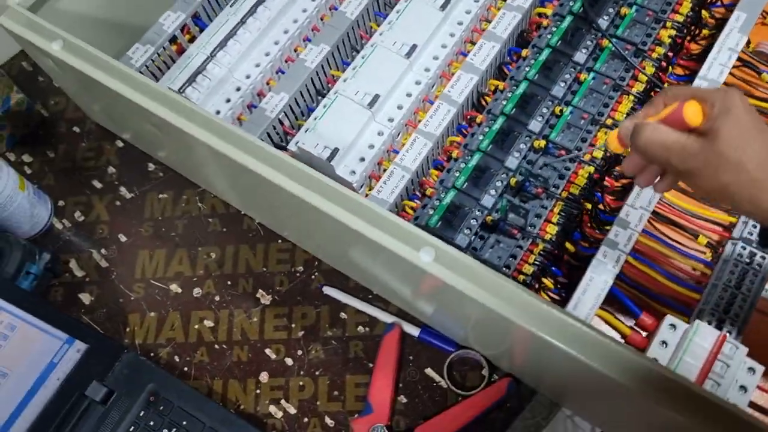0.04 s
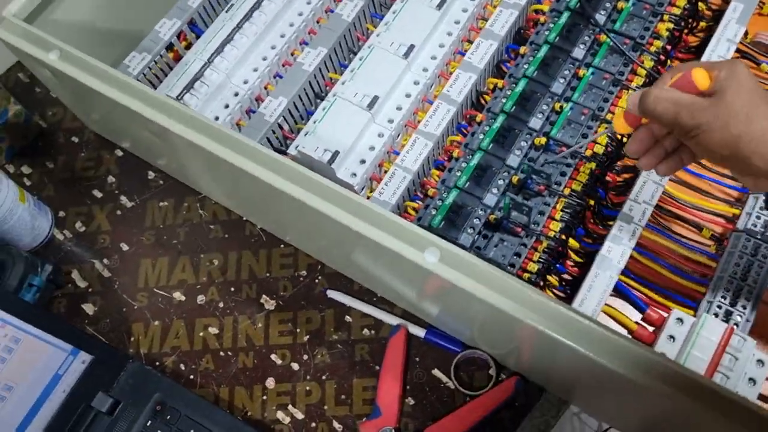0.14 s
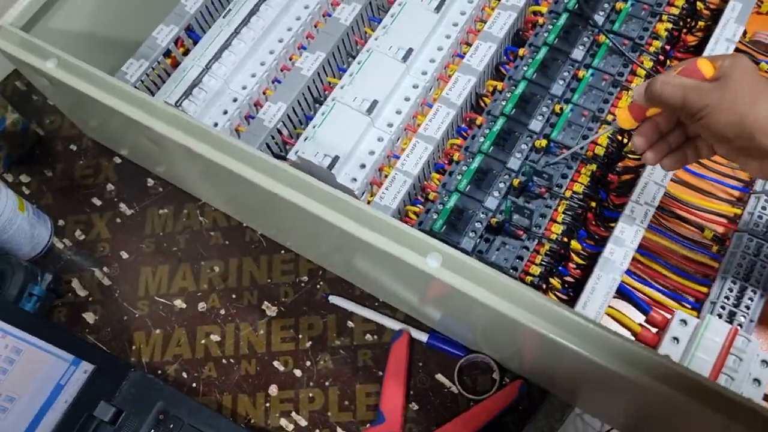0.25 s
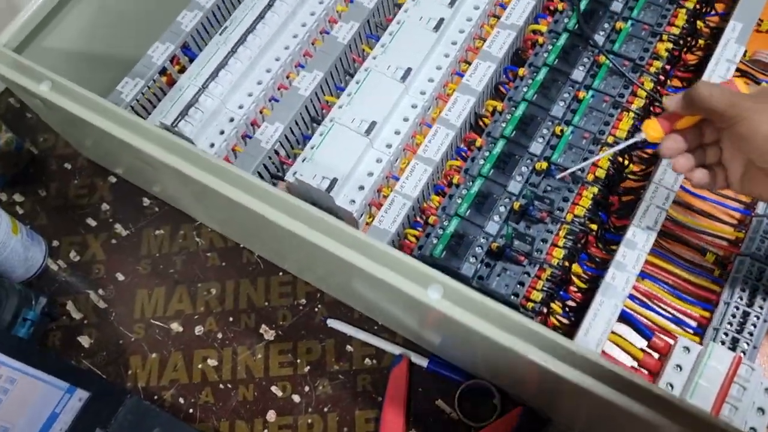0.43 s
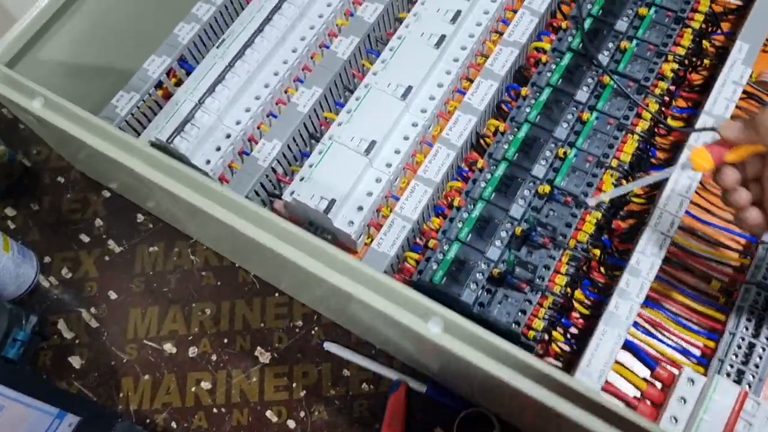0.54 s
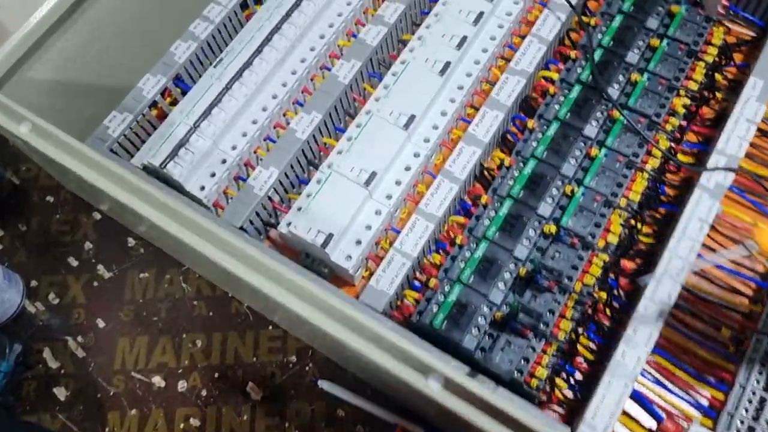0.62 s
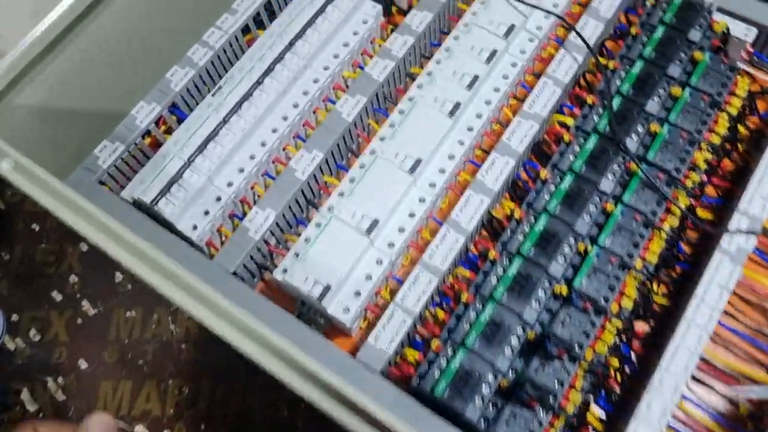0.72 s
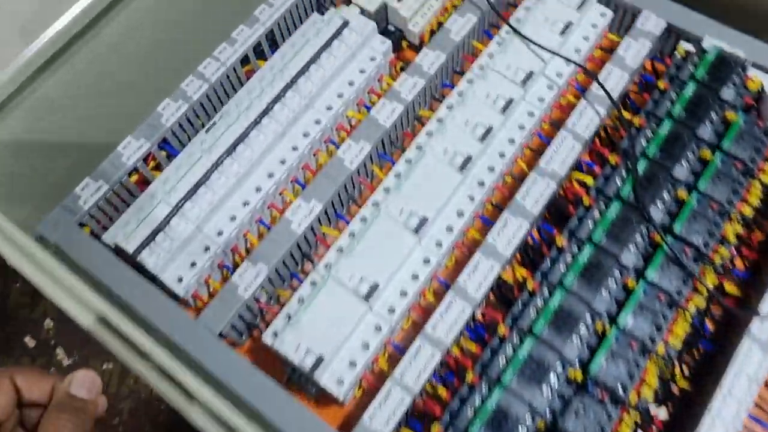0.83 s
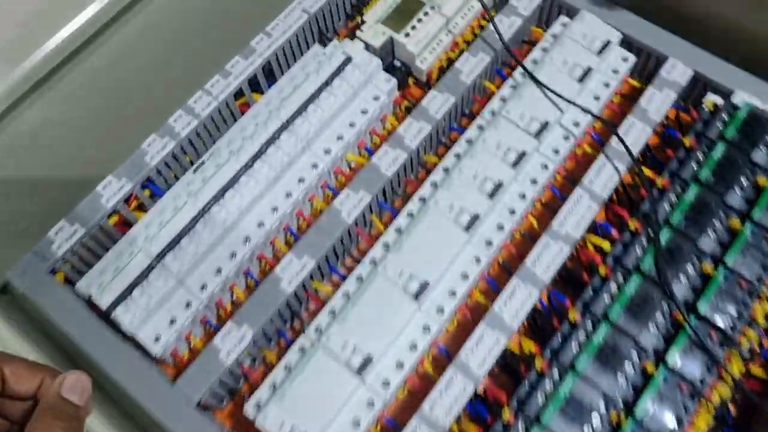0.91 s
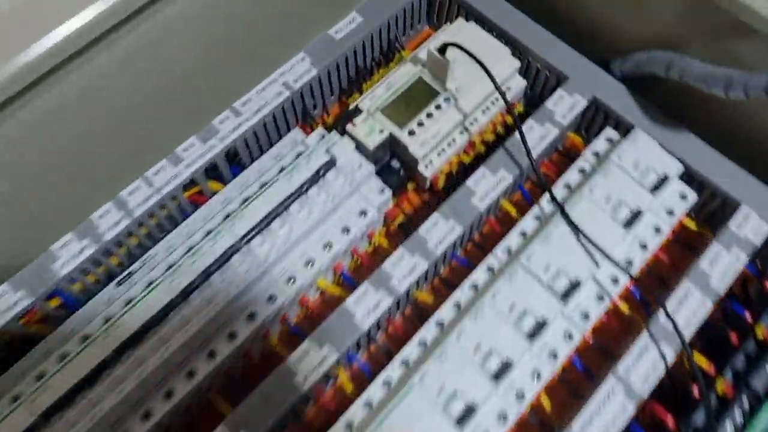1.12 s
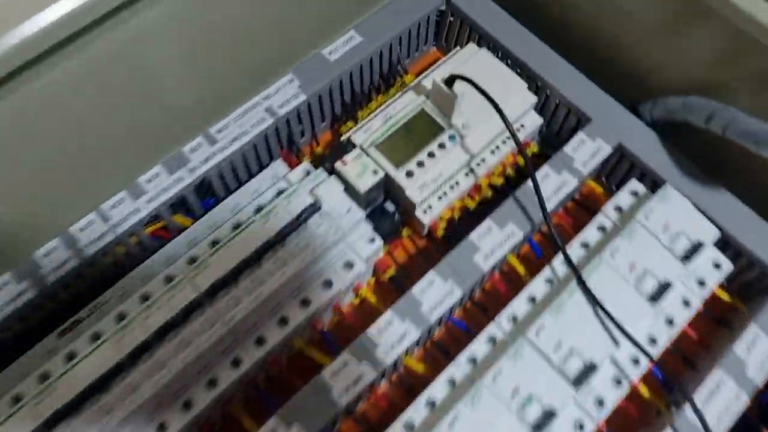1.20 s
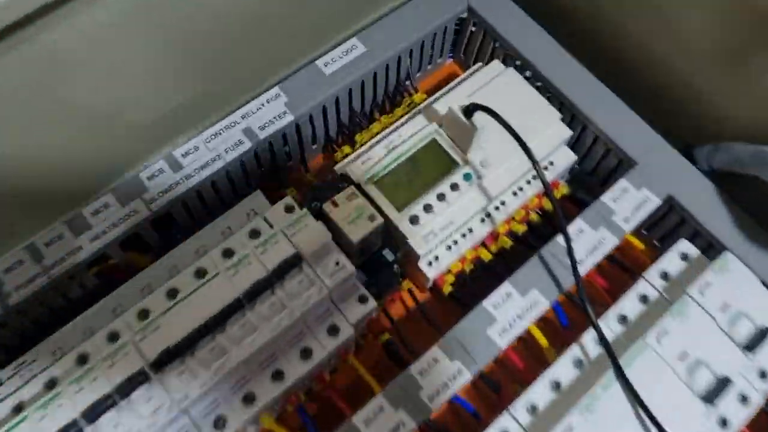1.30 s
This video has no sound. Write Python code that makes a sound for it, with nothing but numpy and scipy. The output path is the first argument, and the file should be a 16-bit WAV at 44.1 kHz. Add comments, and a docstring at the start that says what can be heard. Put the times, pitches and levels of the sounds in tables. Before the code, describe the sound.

Loud hard relay clack, tripped by hand in a steel cabinet, then low boom and faint rustling.

```python
"""Room hiss with a faint mains hum is heard first; then an overload relay in a sheet-steel panel, tripped by hand
close to two microphones: a latch snaps, rebounds, then the contactor slams. Each blow is a chatter of random
impacts that excites housing modes and a decaying room tail; the panel booms low as a sum of damped sines.
Small ticks (resonant noise puffs), a rustle of movement (noise with a drifting resonance), low rumble and
low bumps (damped sines) follow."""
import sys
import numpy as np
from scipy import signal
from scipy.fft import rfft, irfft, next_fast_len
from scipy.io import wavfile
from scipy.ndimage import map_coordinates

SR = 44100
rng = np.random.default_rng(int(sys.argv[2]) if len(sys.argv) > 2 else 0)


def generate_wav(sig):
    """Save sig (samples, or channels by samples) to the path in sys.argv[1] as 16-bit PCM at SR."""
    pcm = np.round(np.clip(np.atleast_2d(sig).T, -1, 1) * 32767).astype(np.int16)
    wavfile.write(sys.argv[1], SR, pcm)


def attenuation_scalar(level_db):
    """Turn a level in dB into a linear amplitude multiplier (20 dB per decade)."""
    decades = np.asarray(level_db, float) / 20
    return 10 ** decades


N = 59535
T = np.arange(N) / SR


def unit(x):
    """Normalisation: scales a signal to rms 1."""
    return x / np.sqrt(np.mean(x ** 2) + 1e-20)


def along(points, hz):
    """Logarithmic frequency scale: interpolates (frequency [Hz], value) points on it."""
    f, v = np.transpose(points)
    return np.interp(np.log(hz + 1), np.log(f + 1), v)


def filtered(x, response):
    """Linear filtering: multiplies the spectrum by a complex response of frequency."""
    m = next_fast_len(N + SR // 2)
    hz = np.fft.rfftfreq(m, 1 / SR)
    return irfft(rfft(x, m) * response(hz), m)[..., :N]


def wobble(rate):
    """Slow random modulation: a smooth curve through rate random knots a second."""
    knots = rng.standard_normal(int(N * rate / SR) + 4)
    return map_coordinates(knots, [T * rate])


def rush(spectrum, alike):
    """Partial coherence: mid and side noises share the power to set left-right likeness; rms 1."""
    def mid_side(hz):
        angle = np.arccos(np.clip(along(alike, hz), -1, 1)) / 2
        return attenuation_scalar(along(spectrum, hz)) * [np.cos(angle), np.sin(angle)]

    mid, side = filtered(rng.standard_normal((2, N)), mid_side)
    return unit(np.array([mid + side, mid - side]))


def lagged(sound, lag_s):
    """Time difference of arrival: a linear phase delays the left microphone by lag_s."""
    return filtered(sound, lambda hz: np.exp(-2j * np.pi * hz * np.array([[lag_s], [0]])))


# Relative noise spectrum of the room: (frequency [Hz], spectral level [dB per Hz])
AIR = [(20, -23.5), (45, -5.5), (85, -2), (130, -23), (250, -23.5), (500, -25.5), (900, -30.5),
       (2000, -34.5), (4000, -34.5), (7000, -33.5), (8500, -43), (10500, -45), (13000, -44), (16000, -40.5)]
# Left-right likeness of diffuse noise: (frequency [Hz], correlation [-1 to 1])
AIR_ALIKE = [(60, 1), (240, 0.94), (950, -0.2), (3770, 0.54), (15000, -0.01)]
# Low movement rumble, before waver and left-right lean: (time [s], level [dB])
RUMBLE = [(.7, -66.5), (.95, -65.5), (1.15, -68.5), (1.22, -55), (1.35, -58.5)]
# Mains hum partials, before waver and left-right lean: (frequency [Hz], rms level [dB])
HUM = [(200, -74), (300, -68), (400, -82)]
AIR_DB = -59  # before the left-right lean


def background():
    """Stationary noise and harmonics: room hiss, swelling movement rumble and wavering mains hum."""
    s, db = np.transpose(RUMBLE)
    low_spectrum = [(25, -18), (55, -6.5), (80, -2.5), (140, -6), (250, -27.5), (500, -25), (900, -82)]
    # the rumble grows from -80 dB over 0.15 s
    low_db = np.interp(T, np.r_[s[0] - 0.15, s], np.r_[-80, db]) + 2.9 * wobble(45)
    low = rush(low_spectrum, [(80, 0.97)]) * attenuation_scalar(low_db)
    hum = np.zeros(N)
    for hz, level in HUM:
        envelope = np.sqrt(2) * attenuation_scalar(level + 0.53 * wobble(15))
        hum += envelope * np.sin(2 * np.pi * (hz * T + rng.random()))
    return attenuation_scalar(AIR_DB) * rush(AIR, AIR_ALIKE) + low + hum


# Reverberation of the room: (frequency [Hz], t60 [s])
ROOM = [(200, 0.55), (1000, 0.27), (4000, 0.26), (8000, 0.21), (10500, 0.19), (15000, 0.19)]


def room(x):
    """Reverberation: convolves with a noise tail whose frequencies each die at their own speed."""
    hz, t, z = signal.stft(rng.standard_normal((2, SR // 2)), SR, nperseg=256)
    decay = attenuation_scalar(-60 * t / along(ROOM, hz)[:, None])
    tail = signal.istft(z * decay, SR, nperseg=256)[1]
    return signal.fftconvolve(x, tail / np.linalg.norm(tail[0]), axes=1)[:, :N]


# Onsets of the blows: (time [s])
BLOW_TIMES = [.1975, .2056, .244, .247, .304, .3128]
# Blows: (level before colouring [dB], rise time constant [s], chatter length [s],
# favoured frequency [Hz], its lift [dB], lift width [octaves])
BLOWS = [(-33.5, 0.00067, 0.024, 5000, 4.5, 0.99), (-13.5, 0.00026, 0.0034, 1210, 6, 0.55),
         (-40, .002, 0.0093, 4800, 21.5, .13), (-44.5, .002, 0.014, 6800, 23, .08),
         (-30.5, .006, .008, 4000, 7.5, 0.53), (-14, 0.000073, .012, 1000, 1, 0.89)]
# Colour of the impacts at each microphone: (frequency [Hz], gain [dB])
CLACK_LEFT = [(100, -20), (250, -1.5), (700, 7), (1300, 7.5), (2000, 2.5), (3500, 4.5), (6000, -1.5),
              (8000, -3), (10000, -2), (13500, -11.5), (16000, -22)]
CLACK_RIGHT = [(100, -8.5), (300, 5.5), (700, 2), (1300, 10), (2000, 3), (3500, 10), (6000, 8.5), (8000, 4),
               (10000, -9), (13500, 2), (16000, -22)]
# Housing modes: (frequency [Hz], level relative to RING_DB [dB], t60 [s])
HOUSING = [(365, -1.5, 0.11), (418.4, -3, .16), (657.7, 0, .09), (679, -24.5, 0.38), (899, -22.5, 0.6),
           (1040, -5, .03), (1236, 0, 0.033), (1650, 0.5, .025), (2757, 0, .04), (3050, 0, 0.028),
           (3964, 4.5, .025), (4263, 2, 0.051), (6330, 4, .025), (7380, 3.5, .02)]
RING_DB, ROOM_DB = -42, -8.5  # housing ring and room tail against the blow
RING_WAVER_DB, RING_WAVER_PER_S = 4, 40
ALIKE, LEFT_LAG_S = 0.34, 0.00035  # share of impact power common to both sides; direct sound lag
CHATTER_PER_S, CHATTER_SPREAD_DB = 12000, 2.5
RELEASE_S = 0.0076  # time constant once the chatter length is over
STRIKE_DB, STRIKE_S = 5, 0.0017  # the first contact stands above the chatter


def relay():
    """Impact excitation of modes: dense chatters of small hits ring the housing and fill the room."""
    out, t = np.zeros((2, N)), T[:SR // 2]
    for s, (db, rise, length, lift_hz, lift_db, octaves) in zip(BLOW_TIMES, BLOWS):
        u = np.clip(T - s, 0, None)
        shape = (1 - np.exp(-u / rise)) * np.exp(-np.clip(u - length, 0, None) / RELEASE_S)
        shape = shape * attenuation_scalar(STRIKE_DB * np.exp(-u / STRIKE_S))

        hits = (rng.random((3, N)) < CHATTER_PER_S / SR) * rng.standard_normal((3, N))
        hits = hits * attenuation_scalar(CHATTER_SPREAD_DB * rng.standard_normal((3, N)))
        # one common train of hits and one for each side
        hits = (np.sqrt(ALIKE) * hits[0] + np.sqrt(1 - ALIKE) * hits[1:]) * shape
        hits = hits * attenuation_scalar(db) * np.linalg.norm(shape) / np.linalg.norm(hits, axis=1, keepdims=True)

        ring = np.zeros(len(t))
        for hz, level, t60 in HOUSING:
            waver_db = RING_WAVER_DB * wobble(RING_WAVER_PER_S)[:len(t)]
            ring += attenuation_scalar(level - 60 * t / t60 + waver_db) * np.sin(2 * np.pi * hz * t)

        def colour(hz):
            lift = lift_db * np.exp(-(np.log2((hz + 1) / lift_hz) / octaves) ** 2)
            return attenuation_scalar(np.array([along(CLACK_LEFT, hz), along(CLACK_RIGHT, hz)]) + lift)

        crack = filtered(hits, colour)
        blow = crack + attenuation_scalar(RING_DB) * signal.fftconvolve(crack, ring[None], axes=1)[:, :N]
        out += lagged(blow, LEFT_LAG_S) + attenuation_scalar(ROOM_DB) * room(blow)
    return out


# Panel booms: (start [s], peak level [dB], rise time constant [s], extra level of the lasting mode [dB])
BOOMS = [(0.213, -24, 0.051, 11.5), (0.3125, -9, 0.049, -2)]
# Panel modes: (frequency [Hz], relative level [dB], t60 [s])
PANEL = [(76.43, -4.5, 0.092), (120, -59.5, .15), (155, -48.5, .12), (179.5, -57.5, 0.29)]
# Lasting mode of the panel: (frequency [Hz], relative level before the extra [dB], t60 [s])
LASTING = (79.3, -53.5, 0.7)
SWELL_POWER = 4  # delays the swell of each boom
DAMPED_S, DAMPED_T60, BOOM_LAG_S = 0.68, 0.11, 0.0004


def panel():
    """Modal superposition: the sheet swings up, rings on its lowest modes and is damped at last."""
    out = np.zeros(N)
    for s, db, rise, lasting_db in BOOMS:
        u = np.clip(T - s, 0, None)
        modes = PANEL + [np.add(LASTING, (0, lasting_db, 0))]
        swing = sum(attenuation_scalar(level - 60 * u / t60) * np.sin(2 * np.pi * hz * u) for hz, level, t60 in modes)
        swing = swing * (1 - np.exp(-u / rise)) ** SWELL_POWER
        out -= attenuation_scalar(db) * swing / np.abs(swing).max()
    damping = attenuation_scalar(-60 * np.clip(T - DAMPED_S, 0, None) / DAMPED_T60)
    return lagged(out * damping, BOOM_LAG_S)


# Small ticks: (time [s], peak level before notch, room and left-right lean [dB], centre frequency [Hz],
# width of each of two cascaded resonances [Hz], decay time constant [s])
TICKS = [(0.5051, -27.5, 5600, 5650, 0.00071), (.5068, -49, 13300, 4000, 0.00049),
         (.5095, -45.5, 13700, 3000, .001), (0.518, -41.5, 6120, 2430, 0.0016),
         (0.521, -52.5, 13400, 2500, 0.00071), (0.6023, -57, 12100, 5000, 0.00045),
         (.611, -48, 4500, 3000, 0.00077), (.639, -54.5, 1180, 1470, 0.0013),
         (.765, -39, 4410, 2040, 0.0011), (.765, -40.5, 2875, 1460, 0.0012),
         (.7695, -48, 2900, 1200, .0015), (.9185, -43, 5780, 2400, 0.013), (.918, -47, 2300, 1210, 0.011),
         (0.916, -49, 12400, 1010, .014), (1.125, -52.5, 6500, 1980, 0.0058)]
TICK_ROOM_DB = -8.5
NOTCH_HZ, NOTCH_WIDTH_HZ, NOTCH_DB = 9830, 1700, -20  # the ticks are weak here


def ticks():
    """Resonant filtering: tiny clicks of settling parts, each a noise puff in one broad resonance."""
    out = np.zeros((2, N))
    for s, db, centre_hz, width_hz, decay in TICKS:
        u = T - s
        noise = rng.standard_normal(N) + 1.4 * rng.standard_normal((2, N))  # common, then one per side
        puff = noise * (u >= 0) * np.exp(-np.abs(u) / decay)

        def resonance(f):
            loss = 1j * f * width_hz
            return (loss / (centre_hz ** 2 - f * f + loss)) ** 2

        puff = filtered(puff, resonance)
        out += attenuation_scalar(db) * puff / np.abs(puff).max()
    out = filtered(out, lambda f: attenuation_scalar(NOTCH_DB * np.exp(-((f - NOTCH_HZ) / NOTCH_WIDTH_HZ) ** 2)))
    return out + attenuation_scalar(TICK_ROOM_DB) * room(out)


# Rustle, before flutter and left-right lean: (time [s], level [dB], reference frequency [Hz])
RUSTLE = [(.55, -92, 2130), (.66, -71, 1860), (.69, -60.5, 1900), (0.741, -65, 1900), (0.819, -60, 2060),
          (.9, -63, 1870), (1.05, -61, 1650), (1.18, -59.5, 1390), (1.35, -62, 1205)]
# Relative noise spectrum of the rubbing: (frequency [Hz], spectral level [dB per Hz])
CLOTH = [(300, -12), (500, -3), (900, -10), (2300, -7), (4300, -10), (6500, -11), (8000, -21.5),
         (10000, -44), (13000, -18), (16000, -34.5)]
RUSTLE_WIDTH_HZ, RUSTLE_PEAK_DB = 170, 8.5
UPPER_RATIO, UPPER_DB = 1.9, -0.5  # a slight dip above the resonance
RUSTLE_FLUTTER_DB, RUSTLE_FLUTTER_PER_S = 1.2, 45


def rustle():
    """Friction noise with a time-varying resonance: rubbing of movement whose colour drifts downward."""
    s, db, reference_hz = np.transpose(RUSTLE)
    f, t, z = signal.stft(rush(CLOTH, AIR_ALIKE), SR, nperseg=512)
    track_hz = np.interp(t, s, reference_hz)

    def bump(ratio):
        return np.exp(-((f[:, None] - ratio * track_hz) / RUSTLE_WIDTH_HZ) ** 2)

    gain = attenuation_scalar(RUSTLE_PEAK_DB * bump(0.98) + UPPER_DB * bump(UPPER_RATIO))
    rubbing = unit(signal.istft(z * gain, SR, nperseg=512)[1][:, :N])
    flutter_db = RUSTLE_FLUTTER_DB * wobble(RUSTLE_FLUTTER_PER_S)
    return rubbing * attenuation_scalar(np.interp(T, s, db, left=-120) + flutter_db)


# Low bumps: (time [s], level of the decay at onset, before the soft rise [dB], frequency [Hz], t60 [s])
BUMPS = [(0.844, -36, 79, 0.13), (0.901, -40.5, 81, 0.14), (1.213, -28, 71.8, 0.11), (1.262, -65, 69, 0.18)]


def bumps():
    """Damped free oscillation: soft low knocks as the panel is touched."""
    out = np.zeros(N)
    for s, db, hz, t60 in BUMPS:
        u = np.clip(T - s, 0, None)
        rise = 1 - np.exp(-u / 0.015)
        out += attenuation_scalar(db - 60 * u / t60) * rise * np.sin(2 * np.pi * hz * u)
    return out


AIR_LEAN_DB, AIR_LEAD_S = -4.5, 0.0001  # left against right: level, and how much earlier


def scene():
    """Superposition at two microphones; the quiet surroundings are louder at the right."""
    around = background() + ticks() + rustle()
    around = lagged(around, -AIR_LEAD_S) * attenuation_scalar([[AIR_LEAN_DB / 2], [-AIR_LEAN_DB / 2]])
    return relay() + panel() + bumps() + around


def roll_off(x):
    """The treble ends steeply here."""
    return signal.sosfilt(signal.butter(12, 16980, fs=SR, output="sos"), x)


CEILING, TOP_HZ = 1, 16100  # full-scale amplitude; corner of the treble roll-off


def record(dry):
    """Saturation and band limiting: a soft ceiling, then a steep treble roll-off."""
    limited = dry / (1 + np.abs(dry / CEILING) ** 6) ** (1 / 6)
    finished = filtered(limited, lambda hz: 1 / np.sqrt(1 + (hz / TOP_HZ) ** 60))
    return roll_off(finished)


dry = scene()
out = record(dry)
generate_wav(out)
```